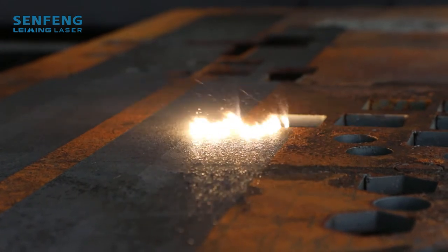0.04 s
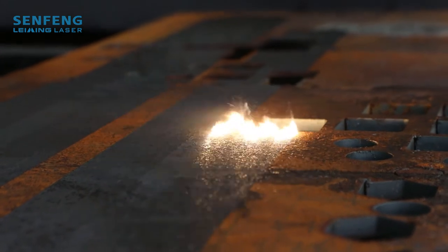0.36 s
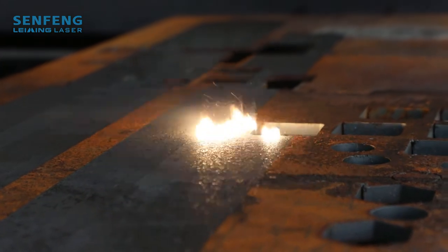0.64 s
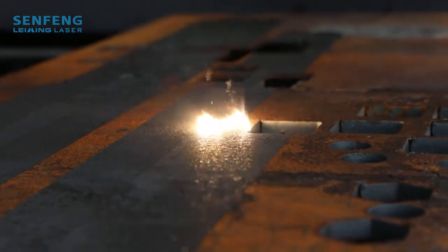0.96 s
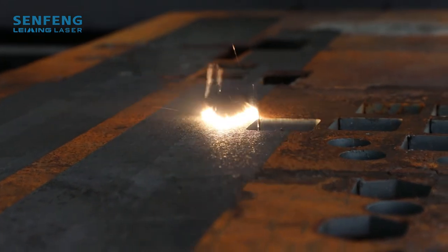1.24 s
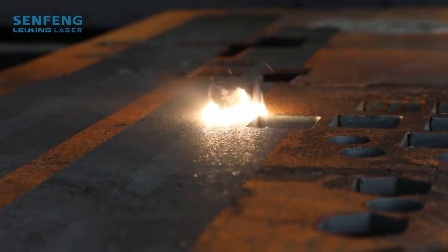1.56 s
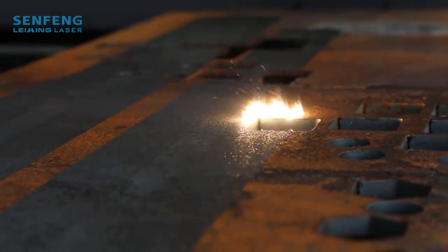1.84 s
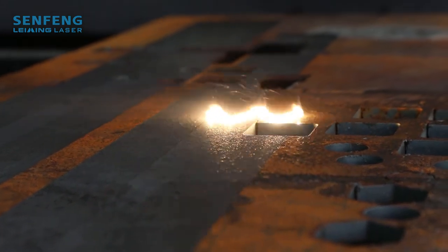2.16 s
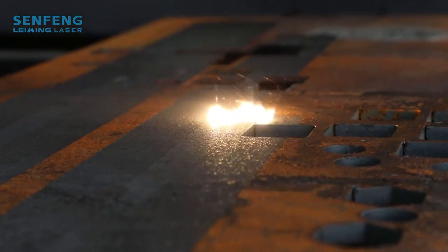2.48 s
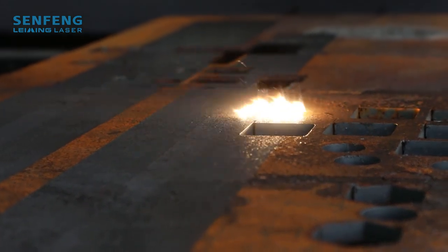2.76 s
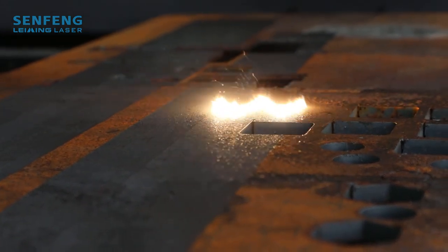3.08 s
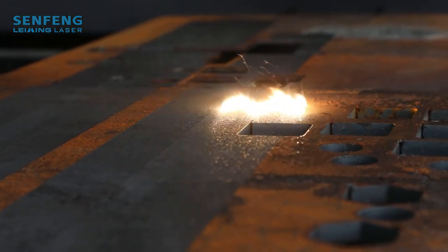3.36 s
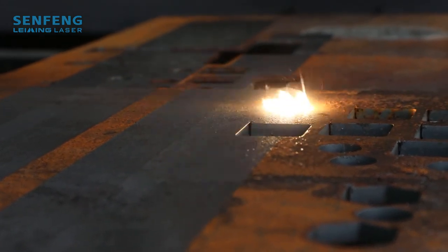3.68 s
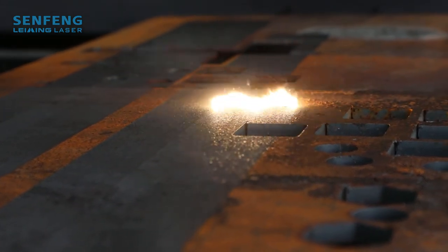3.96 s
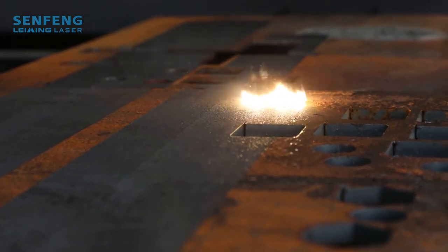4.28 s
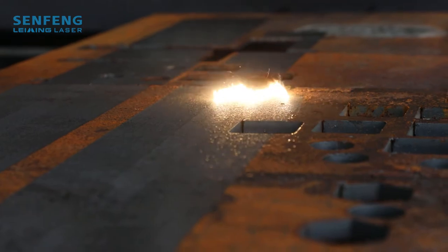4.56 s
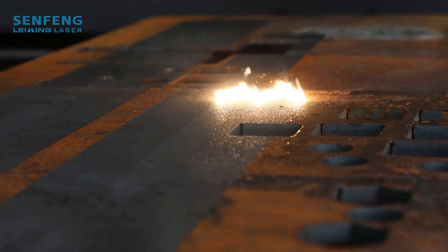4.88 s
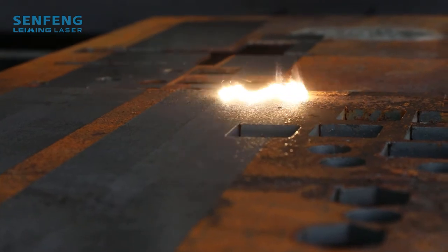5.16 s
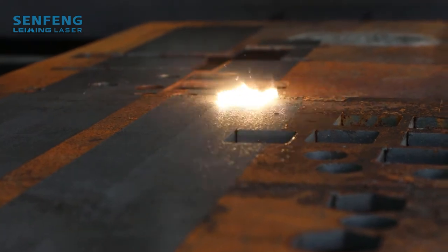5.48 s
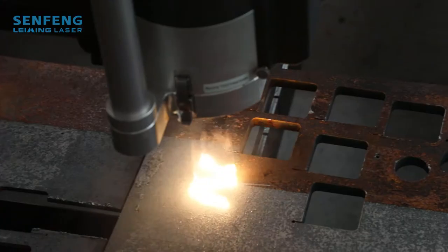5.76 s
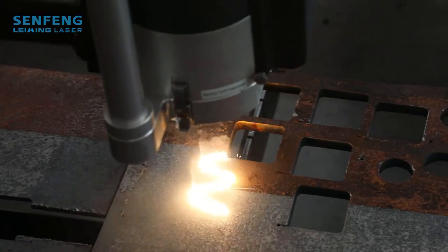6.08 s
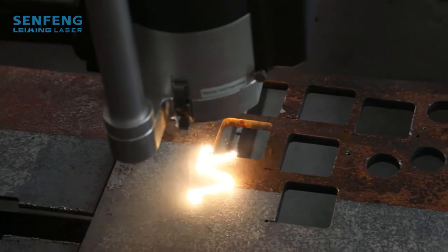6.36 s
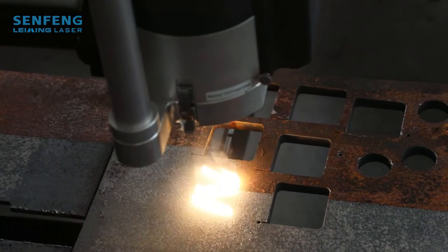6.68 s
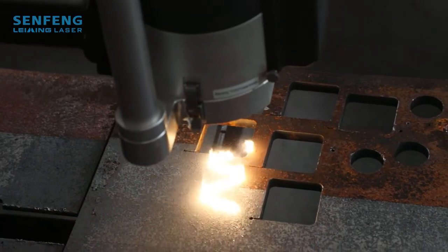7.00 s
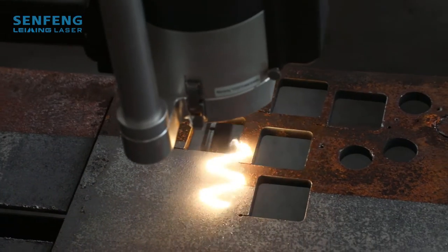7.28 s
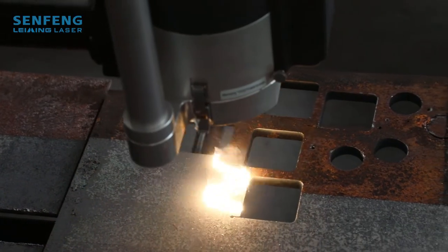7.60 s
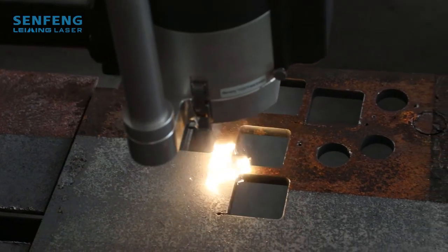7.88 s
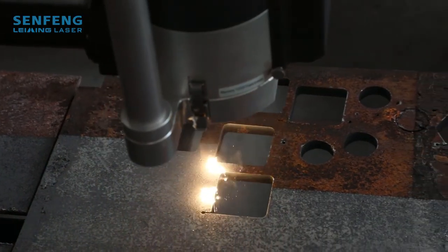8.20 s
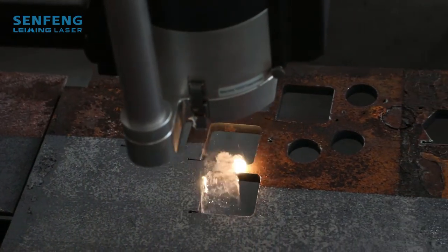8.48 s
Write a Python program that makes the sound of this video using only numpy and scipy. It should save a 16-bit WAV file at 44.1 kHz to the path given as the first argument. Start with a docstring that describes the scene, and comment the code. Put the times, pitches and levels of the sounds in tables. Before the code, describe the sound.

A laser cleans rust off a steel plate in a workshop, making a bright, buzzing rasp that throbs and ticks rapidly. A jet of air hisses steadily with it, and a fume extractor drones faintly behind. The microphone starts at the side of the plate, then after nearly six seconds jumps close to the laser head, where the crackle is fuller and the drone stronger.

```python
"""Laser stripping rust

A pulsed laser cleans a steel plate in a workshop; the microphone is at the side, then close to the head.
Mirrors zigzag the spot over the plate and back 15 times a second: the bursting rust rasps, throbs
and ticks at the turns. Behind it an air jet hisses across the lens and a fume extractor drones."""
import sys
import numpy as np
from scipy import signal
from scipy.fft import rfft, irfft
from scipy.io import wavfile
from scipy.ndimage import uniform_filter1d

SR = 44100
rng = np.random.default_rng(int(sys.argv[2]) if len(sys.argv) > 2 else 0)


def persist_wave(psi):
    """Save psi, clipped to +-1, as 16-bit WAV."""
    counts = np.round(np.clip(psi, -1, 1) * 32767).astype(np.int16)
    wavfile.write(sys.argv[1], SR, np.atleast_2d(counts).T)


N = 376613
TIME = np.arange(N) / SR
SCAN_HZ, STROKES_PER_SCAN = 15.1875, 18   # one scan is a pass out and a pass back
SCAN_SAMPLES = round(SR / SCAN_HZ)


def from_db(db):
    """Decibels to gain."""
    return 10 ** (np.asarray(db) / 20)


def unit_rms(x):
    """Scale to an rms of 1."""
    return x / np.sqrt(np.mean(x ** 2) + 1e-20)


def butterworth(x, order, hz, kind):
    """Gentle causal filter."""
    return signal.sosfilt(signal.butter(order, hz, kind, fs=SR, output="sos"), x)


def swells(rows):
    """Sum of smooth humps, each given as (t/s, rise/s, fall/s, height)."""
    return sum(height * np.exp(-((TIME - t) / np.where(TIME < t, rise_s, fall_s)) ** 2)
               for t, rise_s, fall_s, height in rows)


def colour(x, spectrum, size=4096):
    """Minimum-phase filter of unit energy: only the shape of the spectrum counts."""
    hz, level_db = np.transpose(spectrum)
    grid_hz = np.maximum(np.fft.rfftfreq(size, 1 / SR), 1)
    gain = from_db(np.interp(np.log(grid_hz), np.log(hz), level_db))
    cepstrum = irfft(np.log(gain))
    cepstrum[1:size // 2] *= 2
    cepstrum[size // 2 + 1:] = 0
    response = irfft(np.exp(rfft(cepstrum)))
    return signal.oaconvolve(x, response / np.linalg.norm(response))[:N]


# Steady tones heard from the side and close up: f/Hz, level/dB
TONES_SIDE = [(231.5, -54), (441.4, -57), (468, -57.5), (759, -61)]
TONES_CLOSE = [(258.1, -53.5), (349.1, -48), (637.7, -52), (790, -54), (1109, -51)]
def steady_tones(tones, waver_hz):
    """Faint steady tones, mostly overtones of the scan rate, each wandering a little in pitch."""
    knots_s = np.linspace(0, N / SR, num=60)
    sound = np.zeros(N)
    for hz, level_db in tones:
        pitch_hz = hz + waver_hz * np.interp(TIME, knots_s, rng.standard_normal(len(knots_s)))
        sound += np.sqrt(2) * from_db(level_db) * np.sin(2 * np.pi * np.cumsum(pitch_hz) / SR)
    return sound


# Duct rumble from the side and close up: f/Hz, relative level/dB
DUCT_SIDE = [(20, -19), (40, -19), (62, -12), (85, -14), (120, -7.5), (160, -3), (240, -1), (335, -3),
             (400, -9), (520, -26), (1500, -35)]
DUCT_CLOSE = [(20, -22), (40, -25), (62, -20), (85, -16), (130, -8), (190, 0), (250, 0), (335, -1),
              (400, -7), (520, -18.5), (1500, -48)]
def fume_extractor(spectrum, level_db):
    """Low rush in the suction duct; it sinks once as the head moves along."""
    lull_db = swells([(4.3, .7, 1.36, -4.5)])
    return from_db(level_db + lull_db) * colour(rng.standard_normal(N), spectrum)


# Strength of the jet at the lens: t/s, relative level/dB
AIR_LEVEL = [(0, -25), (.28, -23.5), (.55, -24), (1.05, -22.5), (2.0, -23), (2.25, -22.5), (3.4, -23.5),
             (3.88, -22.5), (4.5, -23.5), (4.8, -23), (5.3, -22.5), (6.1, -23.7), (6.6, -22.7), (7.4, -23),
             (7.78, -24), (8.54, -23)]
# Its hiss from the side and close up: f/Hz, relative level/dB
AIR_SIDE = [(400, -14.5), (1300, -8.5), (1900, -6), (2900, -6), (3600, -9), (4500, -6.5), (5500, -7.5),
            (6400, -2), (7100, -0.5), (8400, -2), (9600, 1.5), (11000, -4), (13000, -9), (15800, -16)]
AIR_CLOSE = [(400, -6.5), (1300, -6), (1900, -2.5), (2900, 0.1), (3600, -0.5), (4500, -5), (5500, -10.5),
             (6400, -1.5), (7100, -4), (8400, -3), (9600, 1.5), (11000, -1.5), (13000, -6), (15800, -24)]
def air_jet(spectrum, gain_db):
    """Smooth turbulence of the air blown across the lens; so thin a jet has no bass."""
    air_db = np.interp(TIME, *np.transpose(AIR_LEVEL))
    hiss = colour(rng.standard_normal(N), spectrum)
    return from_db(air_db + gain_db) * butterworth(hiss, 2, 400, "high")


# Narrow peaks from the side and close up: f/Hz, width/Hz, added gain at the peak
PEAKS_SIDE = [(236, 8.5, .6), (684, 97, .2), (1466, 60, .5), (2200, 79, .15), (2690, 65, .25),
              (7060, 180, .5), (7820, 35, .7), (9610, 180, .25)]
PEAKS_CLOSE = [(250, 47, 0.25), (1800, 250, 0.25), (2710, 55, 0.52), (6560, 530, 0.17), (9250, 260, 0.17),
               (10500, 350, 0.31)]
def ringing_peaks(rush, peaks):
    """Narrow peaks colour the rush, as sound reflects off the plate."""
    ringing = rush
    for hz, width_hz, gain in peaks:
        radius = np.exp(-np.pi * width_hz / SR)
        forward = np.array([1, 0, -1]) * (1 - radius ** 2) / 2
        feedback = [1, -2 * radius * np.cos(2 * np.pi * hz / SR), radius ** 2]
        ringing = ringing + gain * signal.lfilter(forward, feedback, rush)
    return ringing


# When the near end, then the far end, of the scan hangs over a hole: from t/s, to t/s
OVER_HOLE = [(1, 2.1), (0, 1.4)]
# The stretch of plate that ticks hardest: t/s, approach/s, leave/s, added level/dB
HARD_TICKS = [(4.15, .7, .5, 1.8)]
def turn_ticks(turns, hole_loss_db=17, spread_db=1.2, spit_s=.00033):
    """Where the spot dwells it makes a pressure spike and a short spit, both faint over a hole."""
    near, far = OVER_HOLE
    spikes = np.zeros(N)
    for (phase, tick_db), (from_s, to_s) in zip(turns, (near, far, far)):
        times = (np.arange(int(N / SR * SCAN_HZ)) + phase) / SCAN_HZ
        over_hole = (times > from_s) & (times < to_s)
        level_db = tick_db - hole_loss_db * over_hole + spread_db * rng.standard_normal(len(times))
        spikes[np.round(times * SR).astype(int)] += from_db(level_db)
    spikes = spikes * from_db(swells(HARD_TICKS)) + 1e-18
    snap = signal.lfilter([.85], [1, -.5], spikes)
    spit_envelope = .35 * signal.lfilter([1], [1, -np.exp(-1 / (spit_s * SR))], spikes)
    return snap + spit_envelope * rng.standard_normal(N)


# Lifts and dips: t/s, half length/s, then rasp, body and fizz, each as change/dB. They are rust patches,
# except at 5.646 s: a brief swell of low body just before the change to the close position.
LIFTS = [(1.8, 0.28, 0, 3, .5), (3.77, .03, -5, -1, 2), (3.88, .06, 2.5, 0, 1), (4.4, 0.39, -0.5, -1, 2.5),
         (4.797, 0.074, -2.5, -0.5, -0.5), (5.35, 0.34, -2, -1.5, 2), (5.646, 0.064, 2, 5.5, -0.5),
         (6.0, 0.27, 0.5, 0.5, -1.8), (6.95, .2, -1, -1.5, 0), (7.45, .2, .5, -1, 1),
         (8.35, 0.54, -2.5, 3.5, 1.5)]
def lift_db(part):
    """Passing lifts and dips of the rasp, the low body or the top fizz."""
    column = ("rasp", "body", "fizz").index(part)
    return swells([(t, half_s, half_s, lifts[column]) for t, half_s, *lifts in LIFTS])


def plume(rush):
    """The low body and the top fizz of the plume swell and sink."""
    body = butterworth(rush, 1, [400, 1200], "band")
    fizz = butterworth(rush, 1, [11000, 15000], "band")
    return rush + (from_db(lift_db("body")) - 1) * body + (from_db(lift_db("fizz")) - 1) * fizz


def rasp_drift_db(fresh_db=3.5, settle_s=1.5, waver_db=.86, waver_hz=6):
    """The rasp starts strong, settles, and wavers with the rust."""
    knots = rng.standard_normal(200)
    waver = unit_rms(np.interp(TIME * waver_hz, np.arange(len(knots)), knots))
    return fresh_db * np.exp(-TIME / settle_s) + lift_db("rasp") + waver_db * waver


def scan_after_scan(fresh, memory):
    """Play the rows in turn, one a scan, each keeping a share of the scan before."""
    rows = np.vstack([fresh[:1], fresh[1:] * np.sqrt(1 - memory ** 2)])
    scans = signal.lfilter([1], [1, -memory], rows, axis=0)
    return unit_rms(scans.ravel()[:N])


def rust_thickness(crossing_s=.002, memory=.51):
    """Thick and thin rust along the path, changing as the head creeps on."""
    rough = rng.standard_normal((N // SCAN_SAMPLES + 1, SCAN_SAMPLES))
    smooth = uniform_filter1d(rough, round(crossing_s * SR), axis=1, mode="wrap")
    return scan_after_scan(smooth, memory)


def rust_bursts(memory, grain_db, jitter_s):
    """Tiny uneven bursts: each scan meets nearly the same rust, slightly off time, so only lows repeat."""
    shape = (N // SCAN_SAMPLES + 1, SCAN_SAMPLES)
    noise = rng.standard_normal(shape)
    sizes = from_db(grain_db * np.clip(rng.standard_normal(shape), -2, 2))
    slips = np.round(jitter_s * SR * rng.standard_normal(N)).astype(int)
    stroke = (TIME * SCAN_HZ * STROKES_PER_SCAN).astype(int)
    return scan_after_scan(noise * sizes, memory)[(np.arange(N) + slips[stroke]) % N]


# Cut-outs in the plate that deepen the throb: t/s, approach/s, leave/s, added swing/dB
CUT_OUTS = [(1.12, .3, 0.94, 6), (5.1, 0.27, 0.34, 5), (7.0, 0.76, .7, 1.3)]
# Bursting rust from the side and close up: f/Hz, relative level/dB
RASP_SIDE = [(150, -21.5), (500, -12.5), (900, -9), (1350, -10), (1900, 2.4), (2400, 1.8), (2900, -1.5),
             (3500, -7), (5200, -3), (6900, -4.5), (8300, -4.5), (9700, 0), (12500, -2.5), (15800, -6)]
RASP_CLOSE = [(150, -23), (500, -17), (900, -9), (1350, -8), (1900, -2), (2400, 0), (2900, -0.5),
              (3500, -7.5), (5200, -18), (6900, -7), (8300, -13.5), (9700, -7.5), (12500, -9.5),
              (15800, -24)]
def laser_spot(bursts, spectrum, turns, mid_pass, level_db, patchy_db, sharpening):
    """The spot throbs with each pass, buzzes with the strokes, sputters on uneven rust and ticks."""
    swing_db, stroke_db = 1.9, 2.0
    rasp_gain = from_db(level_db + rasp_drift_db())
    scan = SCAN_HZ * TIME
    throb_db = (swing_db + swells(CUT_OUTS)) * np.cos(4 * np.pi * (scan - mid_pass))
    buzz_db = stroke_db * np.cos(2 * np.pi * STROKES_PER_SCAN * (scan - mid_pass))
    bite = from_db(throb_db + buzz_db + patchy_db * rust_thickness())
    _, (stop, _), (restart, _) = turns
    bite *= (scan % 1 < stop) | (scan % 1 > restart)   # the beam rests before the way back
    bite /= np.sqrt(uniform_filter1d(bite ** 2, SCAN_SAMPLES))   # even power from scan to scan
    treble = butterworth(bursts, 1, 13000, "high")
    edge = sharpening * (np.minimum(bite, 2) - 1) * treble   # a harder bite makes sharper bursts
    crackle = bite * (bursts + edge)
    return colour(rasp_gain * crackle + turn_ticks(turns), spectrum)


def from_the_side():
    """Microphone off to the side of the plate: bright rasp and hiss, little drone."""
    turns = [(.002, -6), (.48, -9.5), (.53, -13.5)]   # turn, stop, restart: phase/scans, tick gain/dB
    bursts = rust_bursts(memory=.96, grain_db=3.0, jitter_s=.00008)
    rasp = laser_spot(bursts, RASP_SIDE, turns, mid_pass=.262,
                      level_db=-26.23, patchy_db=1.7, sharpening=.33)
    hiss = air_jet(AIR_SIDE, gain_db=.2)
    rush = plume(rasp + hiss) + fume_extractor(DUCT_SIDE, level_db=-45.65)
    return ringing_peaks(rush, PEAKS_SIDE) + steady_tones(TONES_SIDE, waver_hz=.74)


def close_to_the_head():
    """Microphone close to the head, beside the suction pipe: fuller crackle under the nozzle."""
    turns = [(.78, -16.5), (.3, -19.5), (.32, -24.5)]   # turn, stop, restart: phase/scans, tick gain/dB
    bursts = rust_bursts(memory=.926, grain_db=1.5, jitter_s=.00005)
    rasp = laser_spot(bursts, RASP_CLOSE, turns, mid_pass=.08,
                      level_db=-24, patchy_db=3.0, sharpening=.23)
    hiss = air_jet(AIR_CLOSE, gain_db=1.2)
    rush = plume(rasp + hiss) + fume_extractor(DUCT_CLOSE, level_db=-37)
    return ringing_peaks(rush, PEAKS_CLOSE) + steady_tones(TONES_CLOSE, waver_hz=.815)


def scene():
    """The side position gives way abruptly to the close one."""
    move_s, fade_s = 5.72, .01
    close = np.clip((TIME - move_s) / fade_s + .5, 0, 1)
    return (np.sqrt(1 - close) * from_the_side() + np.sqrt(close) * close_to_the_head())[None]


def record(dry):
    """One microphone, which loses the deep bass; the top is cut steeply."""
    thin = butterworth(dry, 2, 110, "high")
    return signal.sosfilt(signal.ellip(12, .1, 90, 15850, fs=SR, output="sos"), thin)


dry = scene()
out = record(dry)
persist_wave(out)
```